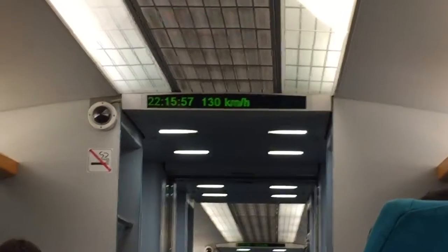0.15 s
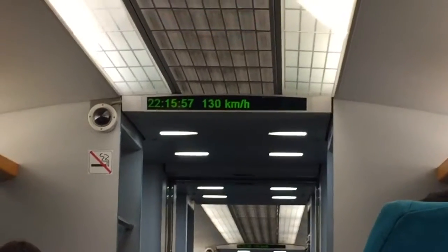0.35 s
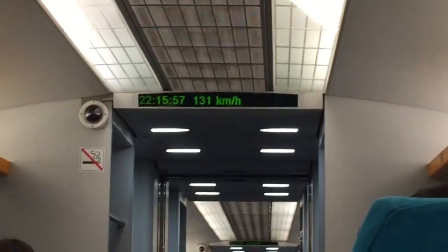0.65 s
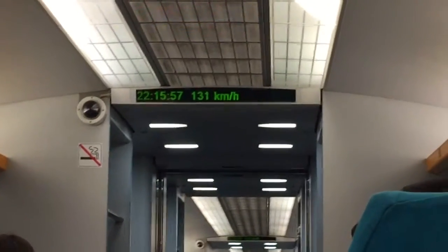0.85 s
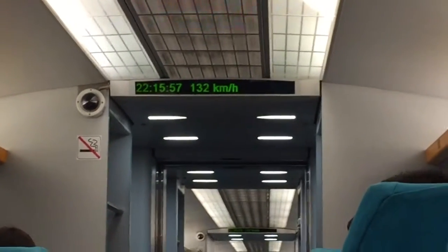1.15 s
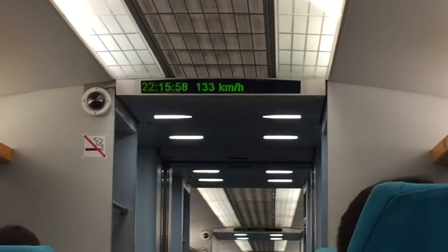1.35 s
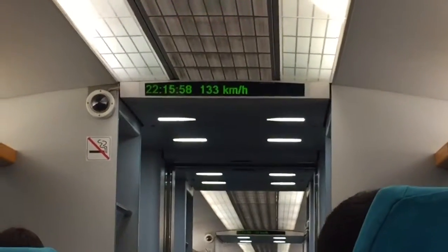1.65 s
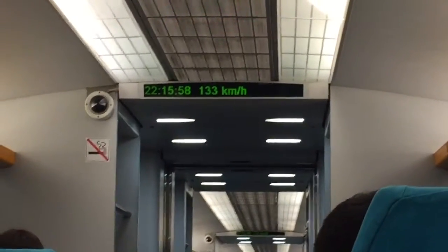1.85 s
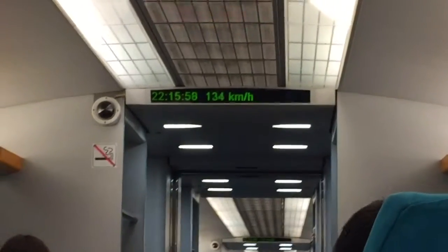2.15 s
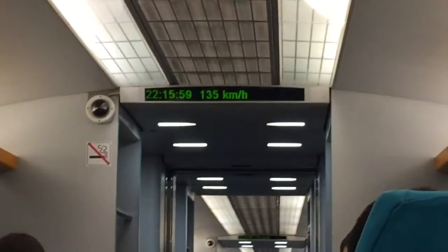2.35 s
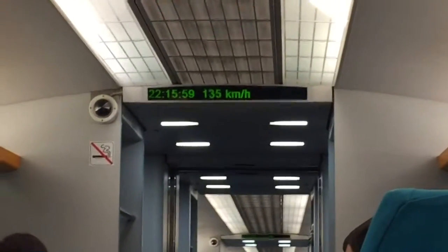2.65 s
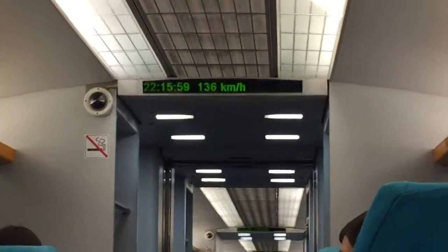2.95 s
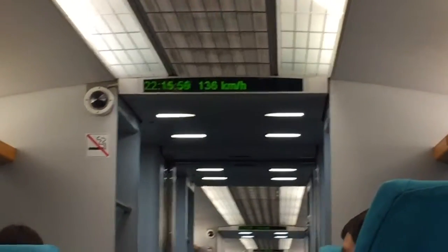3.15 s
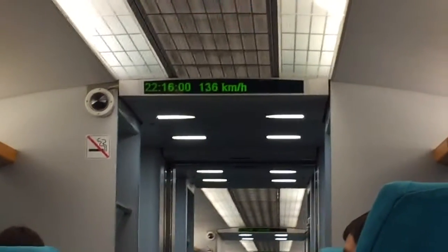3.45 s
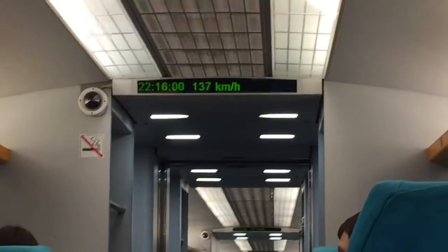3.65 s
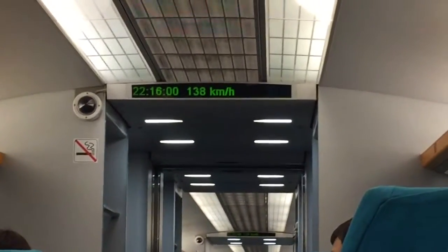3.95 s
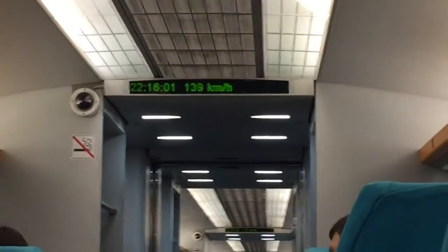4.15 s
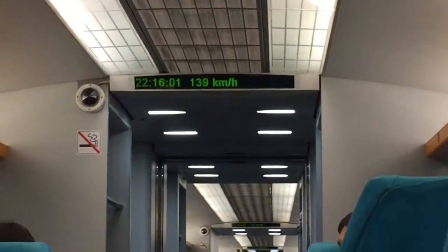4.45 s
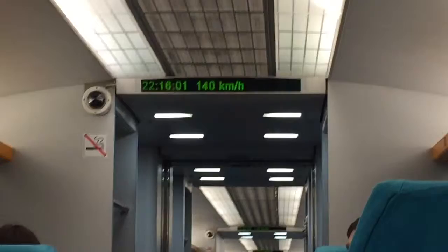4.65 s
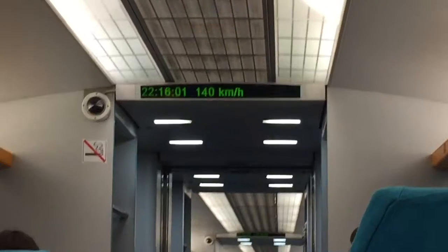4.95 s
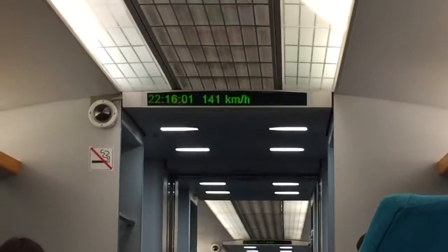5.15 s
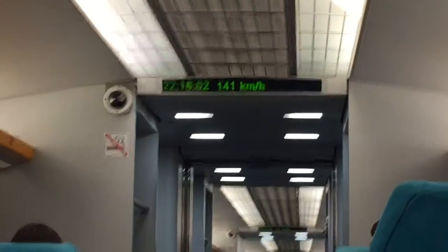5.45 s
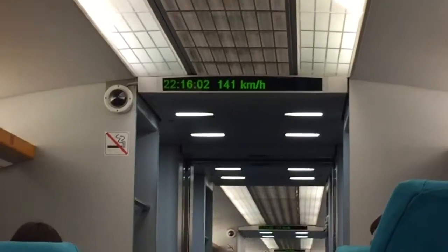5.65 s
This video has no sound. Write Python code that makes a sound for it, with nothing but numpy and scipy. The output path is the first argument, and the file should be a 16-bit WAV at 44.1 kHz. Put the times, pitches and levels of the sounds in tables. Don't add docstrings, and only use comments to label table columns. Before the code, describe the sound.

Heard from a passenger seat, the train car rumbles steadily while many motor tones rise together by a small step. Soft air rush and loose panel buzzing sit underneath. Quiet ticks and knocks come irregularly, a zip-like clink at about 2.3 seconds, then clearer cloth swishes after 4 seconds and faint squeaks of nylon. The low fan hum drops away around 4.4 seconds. Close, small, enclosed single-microphone perspective.

```python
import sys
import numpy as np
from scipy import signal
from scipy.fft import rfft, irfft, next_fast_len
from scipy.io import wavfile

SR = 44100
rng = np.random.default_rng(int(sys.argv[2]) if len(sys.argv) > 2 else 0)


def transcribe(u):
    v = np.clip(np.atleast_2d(u).T, -1, 1)
    q = np.round(v * 32767).astype(np.int16)
    wavfile.write(sys.argv[1], SR, q)


def rack_gain(trim_db):
    fader = np.asarray(trim_db, float)
    return 10 ** (fader / 20)


N = 255901
TIME = np.arange(N) / SR


def rms_one(x):
    return x / np.sqrt(np.mean(x ** 2) + 1e-20)


def drift(rate):
    step = 40
    r = np.exp(-2 * np.pi * rate * step / SR)
    noise = rng.standard_normal(N // step + 2002)
    slow = signal.lfilter([1], [1, -2 * r, r * r], noise)[2000:]
    return np.interp(np.arange(N) / step, np.arange(len(slow)), rms_one(slow))


def coloured(spectrum, size):
    hz = np.fft.rfftfreq(size, 1 / SR) + 1
    points = np.array(spectrum)
    level_db = np.interp(np.log(hz), np.log(points[:, 0]), points[:, 1], left=-200, right=-200)
    return rms_one(irfft(rfft(rng.standard_normal(size)) * rack_gain(level_db), size))


def patchy(x, low_hz, count, shared_db, own_db, rate):
    spectrum = rfft(x)
    octaves = np.log2((np.fft.rfftfreq(len(x), 1 / SR) + 1) / low_hz)
    place = np.clip(2 * octaves, 0, count - 1)
    together = drift(rate)
    out = np.zeros(N)
    for k in range(count):
        share = np.clip(1 - abs(place - k), 0, 1)
        part = irfft(spectrum * share, len(x))[:N]
        out += part * rack_gain(shared_db * together + own_db * drift(rate))
    return rms_one(out)


def lifted(x, peaks):
    hz = np.fft.rfftfreq(len(x), 1 / SR)
    lift_db = sum(db / (1 + (2 * (hz - centre_hz) / width_hz) ** 2) for centre_hz, width_hz, db in peaks)
    return rms_one(irfft(rfft(x) * rack_gain(lift_db), len(x)))


# time in seconds, slots per second.
SLOT_SPEED = [(0, 424.9), (1, 432.5), (2, 439.6), (3, 446.1), (4, 452.7), (5, 460.0), (5.8, 466.2)]
STRONG_MULTIPLES = [9, 27, 36, 72]
STRONG_LEVELS = [-42, -58.5, -50.5, -65]
WEAK_MULTIPLES = [11, 12, 15, 18, 20, 21, 24, 30, 32, 33, 35, 40, 42, 43, 44, 46, 48, 49, 51, 52, 66, 68,
                  108]
WEAK_LEVELS = [-44.5, -44, -56, -51, -69, -60, -64.5, -60, -66, -60.5, -65.5, -71, -58, -65.5, -58.5, -59,
               -60, -58, -58.5, -65, -69, -72, -75]
# pitch in Hz, width in Hz, lift in dB.
BODY_RESONANCES = [(111.3, 1.3, 2), (176.8, 16, 14), (253.6, 22, 7.5), (330.4, 12, 11.5), (414.5, 4.5, 11),
                   (425, 3, 4), (437, 4, 3.5), (443.2, 3, 5.5), (450.4, 2, 8), (455.3, 1.8, 7),
                   (466.2, 13.5, 13), (554, 25, 4), (865, 5, 11), (882, 3, 7), (893.5, 11, 11),
                   (921, 15, 10)]


def guideway():
    slots_per_section = 36
    seconds, slots_per_s = np.transpose(SLOT_SPEED)
    rate = np.interp(TIME, seconds, slots_per_s) / slots_per_section
    turns = 2 * np.pi * np.cumsum(rate) / SR
    scale_hz = np.arange(1500.)
    lift_db = sum(db / (1 + (2 * (scale_hz - hz) / width_hz) ** 4) for hz, width_hz, db in BODY_RESONANCES)
    out = np.zeros(N)
    for multiple, level_db in zip(STRONG_MULTIPLES, STRONG_LEVELS):
        body_db = np.interp(multiple * rate, scale_hz, lift_db)
        loudness = rack_gain(level_db + body_db + multiple / 50 + 2.2 * drift(9))
        phase = rng.uniform(0, 2 * np.pi) + 2 * np.pi * .075 * drift(6)
        out += loudness * np.sin(multiple * turns + phase)
    gap_waver = [drift(1.2) for _ in range(6)]
    for k, (multiple, level_db) in enumerate(zip(WEAK_MULTIPLES, WEAK_LEVELS)):
        body_db = np.interp(multiple * rate, scale_hz, lift_db)
        loudness = rack_gain(level_db + body_db + 2.5 * gap_waver[k % len(gap_waver)] + 1.2)
        out += loudness * np.sin(multiple * turns + rng.uniform(0, 2 * np.pi))
    return np.sqrt(2) * out


# pitch in Hz, level in dB per Hz.
RUMBLE_COLOUR = [(15, -30), (22, -28), (30, -19), (36, -10), (42, -5.5), (48, -3.5), (56, -3), (75, 0),
                 (88, -2), (98, 0), (120, -3), (140, -2), (165, -8), (200, -11), (300, -50)]
# pitch in Hz, level in dB per Hz.
DRONE_COLOUR = [(150, -10.5), (210, -1), (300, -6), (380, -8.5), (450, -6), (520, -8.5), (600, -6.5),
                (640, -9.5), (690, -18), (820, -17), (920, -16.5), (1000, -24), (1150, -29), (1600, -59)]
# pitch in Hz, level in dB per Hz.
HISS_COLOUR = [(650, -31), (1100, 3.5), (1390, -0.5), (1500, -3), (1800, -6.5), (2350, -12.5),
               (3400, -18.5), (4200, -20.5), (4900, -27), (6200, -24.5), (7500, -43.5), (11000, -66)]


def car_body():
    size = next_fast_len(N)
    t = TIME - TIME[-1] / 2
    rumble = patchy(coloured(RUMBLE_COLOUR, size), 40, count=5, shared_db=.3, own_db=.6, rate=3.0)
    drone = patchy(coloured(DRONE_COLOUR, size), 220, count=5, shared_db=.15, own_db=.45, rate=3.0)
    hiss = patchy(coloured(HISS_COLOUR, size), 1200, count=6, shared_db=1.0, own_db=1.7, rate=7.0)
    out = rack_gain(-31 - 0.28 * t) * rumble
    out += rack_gain(-39.5 + 0.37 * t) * drone
    out += rack_gain(-63.5 - 0.18 * t) * hiss
    return out


def fan():
    fan_hz, level_db = 47.9, -40
    off_s, rundown_s, loss_db = 4.4, 0.23, 11.5
    sunk = np.clip((TIME - off_s) / rundown_s, 0, 1)
    return np.sqrt(2) * rack_gain(level_db - loss_db * sunk) * np.sin(2 * np.pi * fan_hz * TIME)


# start of the steady part in seconds, level in dB,
# rise in seconds per 20 dB, steady part in seconds, fall in seconds per 20 dB.
STROKES = [
    (.03, -64.5, .25, .06, .14),
    (.548, -65, .007, .04, .05),
    (4.195, -52, .09, .075, .085),
    (4.838, -38.2, .016, .029, .048),
]
# pitch in Hz, level in dB per Hz.
STROKE_COLOURS = [
    [(1180, -26), (2000, 5.5), (3560, -6), (4250, -5.5), (5970, 0), (10400, -17), (15200, -21)],
    [(880, -25), (1500, 1), (2230, -7), (3040, -14), (3190, -13), (5330, -15), (15200, -37)],
    [(710, -41), (1200, -7), (1890, -7), (2470, 0), (2630, -4), (3740, -7.5), (4430, -11), (5900, -15),
     (10600, -26.5), (11400, -24), (15200, -31)],
    [(880, -37), (1500, -6), (1750, -4), (1990, -5.5), (2170, 1), (2600, -5), (3130, -1.5), (4230, -3),
     (5030, -11.5), (6410, -8.5), (6990, -15), (11600, -26), (15200, -30.5)],
]
# pitch in Hz, width in Hz, lift in dB.
FOLD_PEAKS = [
    [(2620, 230, 2), (4200, 400, 4), (6070, 300, 1), (10900, 300, 2), (12200, 400, 5)],
    [(1950, 150, 6), (2350, 130, 4), (6300, 900, 2.5), (8600, 500, 5)],
    [(2400, 450, 2.5), (14300, 1500, 3), (3800, 450, 3), (5770, 370, 7), (7200, 260, 8), (8120, 250, 6),
     (9160, 300, 8), (11100, 390, 6)],
    [(1780, 200, 8.5), (2170, 140, 3), (3240, 100, 1.5), (3680, 150, 3.5), (4020, 200, -2), (5750, 250, 2),
     (6560, 220, 6.5), (7370, 200, 4)],
]
# lift in dB while speeding up, lift in dB while slowing.
STROKE_TREBLE = [(4, 2), (4, 2.5), (6.5, 1.5), (2.5, 5.5)]


def swishes():
    out = np.zeros(N)
    weave_db = 1.8 * drift(70)
    treble = signal.butter(2, 4000, "high", fs=SR, output="sos")
    for stroke, colour, peaks, treble_db in zip(STROKES, STROKE_COLOURS, FOLD_PEAKS, STROKE_TREBLE):
        s, level_db, attack, hold, release = stroke
        start = max(round((s - .3) * SR), 0)
        t = TIME[start:start + SR * 3 // 4]
        noise = lifted(coloured(colour, len(t)), peaks)
        top = signal.sosfilt(treble, noise)
        cloth = noise + (rack_gain(np.interp(t, [s, s + hold], treble_db)) - 1) * top
        shape_db = -20 * np.maximum(0, np.maximum((s - t) / attack, (t - s - hold) / release))
        out[start:start + len(t)] += rack_gain(level_db + shape_db + weave_db[start:start + len(t)]) * cloth
    return out


# start in seconds, length in seconds, centre pitch in Hz, level in dB,
# width of the roughness in Hz.
NYLON_SQUEAKS = [(4.036, 0.022, 11350, -76, 130), (4.068, .03, 11100, -85, 130),
                 (4.088, .027, 11150, -75, 130), (4.145, .03, 11100, -75, 130),
                 (4.25, .09, 11200, -79, 200), (4.71, .05, 11150, -86, 60), (5.112, .02, 11100, -78, 80),
                 (5.13, .02, 11200, -83, 200), (5.385, 0.05, 11050, -82, 100), (5.43, .05, 11400, -72, 350),
                 (5.46, .06, 11600, -73, 450), (5.5, .05, 11150, -73, 250)]


def squeaks():
    out = np.zeros(N)
    t = TIME[:SR // 5]
    for s, length, hz, level_db, width_hz in NYLON_SQUEAKS:
        slow = signal.butter(2, width_hz, fs=SR, output="sos")
        rough = signal.sosfilt(slow, rng.standard_normal((2, len(t))))
        angle = 2 * np.pi * hz * t
        band = rms_one(rough[0] * np.cos(angle) + rough[1] * np.sin(angle))
        start = round(s * SR)
        out[start:start + len(t)] += rack_gain(level_db) * band * np.sin(np.pi * np.clip(t / length, 0, 1))
    return out


def bursts(rows, cycles, rise, width_share):
    out = np.zeros(N)
    t = TIME[:SR // 5]
    for s, level_db, hz in rows:
        t60 = cycles / hz
        width_hz = width_share * hz
        low = np.hypot(hz, width_hz / 2) - width_hz / 2
        high = min(low + width_hz, .45 * SR)
        band_filter = signal.butter(2, [low, high], "band", fs=SR, output="sos")
        band = rms_one(signal.sosfilt(band_filter, rng.standard_normal(len(t))))
        envelope = rack_gain(level_db - 60 * t / t60) * (1 - np.exp(-t / (rise * t60)))
        start = round(s * SR)
        out[start:start + len(t)] += (envelope * band)[:N - start]
    return out


# start in seconds, level in dB, centre pitch in Hz.
CREASE_TICKS = [(.232, -68, 6440), (0.541, -54.5, 6400), (1.125, -72, 7700), (2.169, -65, 6000),
                (2.172, -58, 2500), (2.277, -64, 12700), (2.299, -58, 4500), (2.301, -61, 6500),
                (2.3, -66, 8800), (2.303, -65.5, 12000), (2.3, -65, 14150), (2.311, -66, 12500),
                (2.311, -72, 5030), (2.277, -69, 9500), (2.277, -74, 6500), (2.325, -60, 1800),
                (2.3, -55, 2200), (2.299, -56, 3400), (2.168, -69, 7800), (2.169, -63, 4200),
                (2.18, -66, 2900), (2.184, -69, 6800), (2.305, -63, 9300), (2.316, -68, 14000),
                (2.285, -66, 12500), (2.492, -74, 6500), (2.612, -69, 6700), (2.612, -63, 3900),
                (2.605, -64, 6600), (2.913, -62.5, 8800), (3.225, -68, 7000), (3.3, -68, 6700),
                (4.39, -67, 6000), (4.803, -68, 3900), (4.112, -63, 5900), (4.405, -66, 6200),
                (.553, -59, 6000), (.578, -65, 8800), (.542, -66, 9300), (.544, -69, 12500),
                (.558, -69, 13000), (.56, -68, 9000), (5.2, -70.5, 13000), (5.257, -67, 11800),
                (5.257, -69, 14200), (5.257, -69, 8500), (5.31, -66, 9000), (5.31, -60, 14200),
                (5.325, -70, 13000), (5.495, -70, 4500), (5.31, -57, 11800), (5.487, -60, 2170),
                (5.487, -69, 5300), (5.6, -67, 11800), (5.615, -70, 12000), (5.66, -71, 5800)]


def ticks():
    return bursts(CREASE_TICKS, cycles=246, rise=.05, width_share=.26)


# start in seconds, level in dB, pitch in Hz,
# time to die by 60 dB in seconds.
STRUCK_RINGS = [(2.299, -46.5, 1327, 0.15), (2.303, -57, 1820, 0.14), (2.302, -58, 2540, 0.057),
                (2.298, -63, 3240, 0.058), (2.302, -58, 3380, .07), (2.302, -62, 4020, .06),
                (2.305, -71, 5320, 0.056), (2.306, -67, 5860, 0.073), (2.306, -71, 9200, .02),
                (2.314, -72, 6550, .05), (.515, -58, 1300, .2), (.57, -62, 2350, .1), (.57, -62, 1950, .12),
                (.885, -61, 1950, .12), (.69, -63, 2600, .16), (.89, -64, 2600, .16), (1.14, -63, 2620, .12),
                (1.63, -62, 2600, .14), (1.64, -64, 3000, .08), (.86, -57, 1310, .16), (2.045, -60, 1640, .2),
                (1.29, -62, 1950, .2), (1.035, -56, 1315, .25), (1.14, -64, 1950, .1), (1.865, -66, 2980, .1),
                (4.066, -56, 2150, 0.1), (4.083, -58, 1880, .1), (4.05, -68, 3900, .08), (2.5, -59, 1960, .16),
                (2.505, -63, 2620, .12), (2.51, -64, 3000, .06), (2.77, -60, 1850, .08),
                (5.487, -57, 2150, .06), (5.145, -62, 2450, .08), (4.804, -53, 2830, 0.14),
                (4.96, -58, 3470, .05), (5.025, -68, 3260, .1)]


def rings():
    out = np.zeros(N)
    t = TIME[:SR // 8]
    rise_s = .0025
    slow = signal.butter(2, 200, fs=SR, output="sos")
    for s, level_db, hz, t60 in STRUCK_RINGS:
        rough = .8 + .6 * rms_one(signal.sosfilt(slow, rng.standard_normal(len(t))))
        envelope = rack_gain(level_db - 60 * t / t60) * (1 - np.exp(-t / rise_s))
        start = round(s * SR)
        out[start:start + len(t)] += envelope * rough * np.sin(2 * np.pi * hz * t)
    return out


# start in seconds, level in dB, centre pitch in Hz.
FITTING_KNOCKS = [(.575, -62.5, 2700), (0.631, -58, 2090), (.64, -68, 5000), (.878, -57.5, 2080),
                  (.96, -58, 1890), (1.03, -55, 1350), (1.04, -65, 1950), (1.13, -57.5, 2230),
                  (1.635, -54, 2280), (1.862, -57.5, 2480), (2.495, -54, 2000), (2.508, -62, 3300),
                  (.57, -56, 1900), (.7, -58, 1900), (1.22, -58, 1300), (1.3, -61, 1900), (1.95, -59, 1800),
                  (2.05, -60, 2000), (2.2, -54, 1250), (4.08, -55, 1150), (4.42, -56, 1200),
                  (5.25, -54, 1300), (2.69, -66, 1950), (2.769, -61, 2000), (2.805, -61, 2800),
                  (3.869, -58.5, 2000), (4.047, -58, 3280), (4.063, -54, 2100), (4.47, -57.5, 1890),
                  (4.52, -60, 2600), (4.6, -58.5, 2000), (5.05, -68, 6000), (4.73, -68, 6300),
                  (4.72, -59, 2300), (4.84, -43, 1360), (4.92, -49, 2400), (4.95, -58, 3500),
                  (5.02, -63, 3200), (5.03, -51, 1840), (5.145, -59.5, 2500), (5.35, -61, 3100),
                  (5.52, -61, 2200)]


def knocks():
    return bursts(FITTING_KNOCKS, cycles=310, rise=.081, width_share=.45)


# pitch in Hz, level in dB per Hz.
RUSTLE_COLOUR = [(800, -17), (1100, -1), (1400, -2), (2000, -10), (3300, -21), (4600, -28.5), (6000, -23),
                 (7500, -33)]


def rustle():
    start_s, rise_s, level_db = 4.65, 0.3, -64
    noise = coloured(RUSTLE_COLOUR, next_fast_len(N))
    noise = patchy(noise, 1200, count=5, shared_db=1.0, own_db=2, rate=8.0)
    return rack_gain(level_db) * noise * np.clip((TIME - start_s) / rise_s, 0, 1)


# pitch in Hz, level in dB.
TRIM_PANELS = [(1060, 2), (1150, -7.5), (1300, 2.5), (1370, 1), (1500, -1), (1650, 2), (1780, -9),
               (1950, -1), (2150, -3.5), (2340, -9.5), (2600, -8), (2800, -15.5), (3000, -13),
               (3300, -14.5), (3600, -15.5)]


def rattles():
    taps_per_s, level_db, t60 = 600, -69.5, .065
    sizes = rack_gain(4 * np.minimum(rng.exponential(1, N), 4)) * rng.choice([-1, 1], N)
    taps = sizes * (rng.random(N) < taps_per_s * rack_gain(3 * drift(8)) / SR)
    panel = rng.integers(0, len(TRIM_PANELS), N)
    r = rack_gain(-60 / (t60 * SR))
    out = np.zeros(N)
    for k, (hz, panel_db) in enumerate(TRIM_PANELS):
        ring = [1, -2 * r * np.cos(2 * np.pi * hz / SR), r * r]
        struck = signal.lfilter([1, 0, -1], ring, taps * (panel == k) + 1e-18)
        out += rack_gain(panel_db) * signal.lfilter([1, 0, -1], ring, struck)
    return rack_gain(level_db) * rms_one(out)


def cabin(x):
    t60, level_db = .12, -10
    t = TIME[:SR // 3]
    sparse = rng.random(len(t)) < .05
    echoes = rng.standard_normal(len(t)) * sparse * rack_gain(-60 * t / t60) * (t > .002)
    seats = signal.butter(1, 7000, fs=SR, output="sos")
    echoes = signal.sosfilt(seats, echoes)
    echoes /= np.sqrt(np.sum(echoes ** 2))
    return x + rack_gain(level_db) * signal.fftconvolve(x, echoes)[:N]


def scene():
    car = guideway() + car_body() + fan() + rustle() + rattles()
    close_by = cabin(swishes() + ticks() + rings() + knocks()) + squeaks()
    return (car + close_by)[None]


# pitch in Hz, level in dB per Hz.
MIC_HISS = [(1500, -10), (3000, -4), (5000, -6), (6500, -5), (8000, -6), (9700, -8), (10400, -11),
            (11200, -8.5), (13000, -9.5), (15500, -10)]


def microphone(dry):
    ceiling = 0.36
    first, last, swing_s = -.089, -.015, .003
    dry = ceiling * np.tanh(dry / ceiling)
    swing = np.exp(-(TIME / swing_s) ** 2)
    ends = (first - dry[:, :1]) * swing + (last - dry[:, -1:]) * swing[::-1]
    return dry + ends + rack_gain(-79) * coloured(MIC_HISS, N)


def low_pass(x):
    return signal.sosfilt(signal.butter(12, 15310, fs=SR, output="sos"), x)


def record(dry):
    mix = microphone(dry)
    return low_pass(mix)


dry = scene()
out = record(dry)
transcribe(out)
```